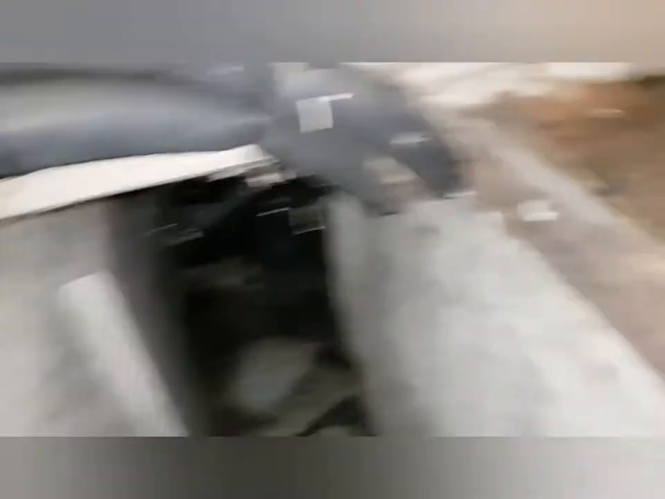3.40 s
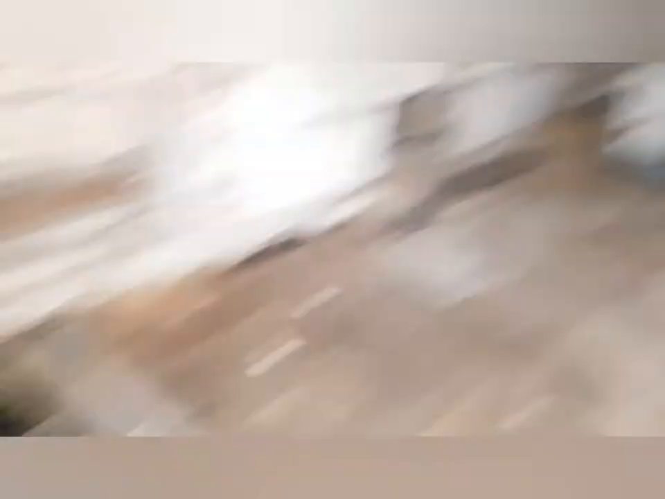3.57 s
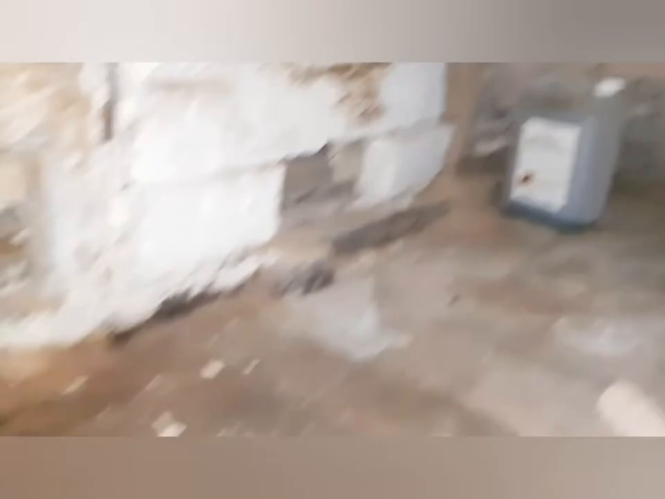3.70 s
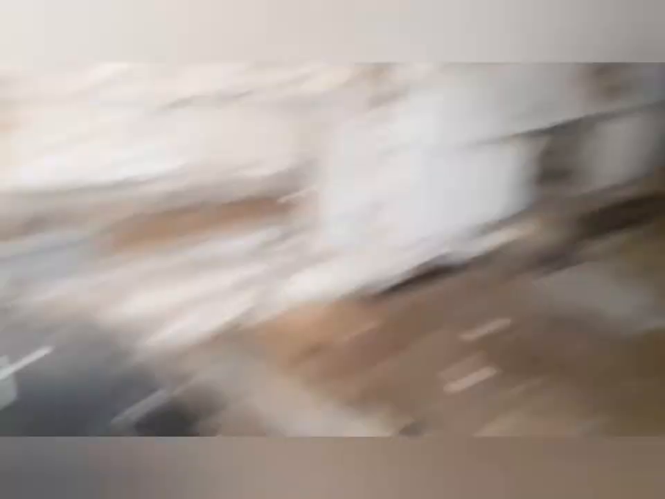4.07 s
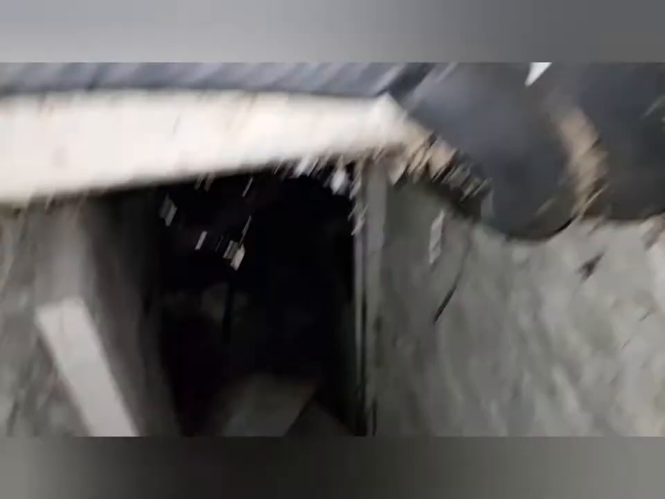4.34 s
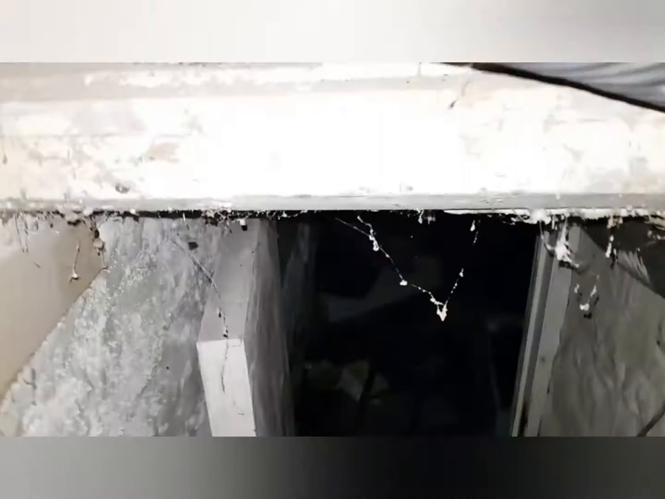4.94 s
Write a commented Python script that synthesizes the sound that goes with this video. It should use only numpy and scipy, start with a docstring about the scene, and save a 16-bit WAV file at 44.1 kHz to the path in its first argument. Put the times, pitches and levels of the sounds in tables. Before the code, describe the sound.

Someone walks carefully indoors: two heavy floor thumps early on, then lighter steps, fabric rustles and gritty scuffs over a faint low rumble.

```python
"""Footsteps on a littered board floor

Someone walks through an empty building, carrying a small two-port microphone.
Blows of feet, and a few cracks of litter, sum a one-swing push with decaying rings; sparse echoes follow.
Clothing swishes and soles scrape grit as shaped noise under one uneven grip.
Behind lie low swells of noise, a wavering sine hum in the first second or so, and faint steady air noise."""
import sys
import numpy as np
from scipy import signal
from scipy.io import wavfile
from scipy.ndimage import uniform_filter1d

SR = 44100
rng = np.random.default_rng(int(sys.argv[2]) if len(sys.argv) > 2 else 0)


def ratio_of_db(decibels):
    """Turn decibels (scalar or array-like) into linear amplitude factors; 0 dB maps to 1."""
    return 10 ** (np.asarray(decibels, float) / 20)


def persist_wave(psi):
    """Save psi, clipped to +-1, as 16-bit WAV."""
    counts = np.round(np.clip(psi, -1, 1) * 32767).astype(np.int16)
    wavfile.write(sys.argv[1], SR, np.atleast_2d(counts).T)


N = 270333  # samples


# modes of the boards, before a small random detuning: ring_hz, level_db, t60_s
BOARD_MODES = [(105, 1, 0.14), (151, 4.5, 0.25), (211, 2, 0.19), (275, 0, 0.13), (400, -6.5, 0.14),
               (660, -5, 0.18), (880, -5, 0.13)]


def floor_rings(t, ring_hz, hard_db):
    """Modal synthesis: a blow excites decaying sines, strongest near its own pitch."""
    boards, litter = len(BOARD_MODES), 110
    count = boards + litter
    board_hz, board_db, board_t60 = np.transpose(BOARD_MODES)[:, :, None]
    board_hz = board_hz * (1 + 0.024 * (rng.random((boards, 1)) - .5))
    # litter rings spread evenly over three octaves from 410 Hz
    litter_hz = 410 * 8 ** ((np.arange(litter)[:, None] + rng.random((litter, 1))) / litter)
    litter_db = np.full((litter, 1), -14.5)
    litter_t60 = 0.16 * (400 / litter_hz) ** 0.5  # higher rings die sooner
    hz = np.vstack([board_hz, litter_hz])
    t60 = np.vstack([board_t60, litter_t60])

    octaves = np.log2(hz / ring_hz)
    slope_db = np.where(octaves > 0, hard_db, 15.5)  # dB per octave, above and below the pitch
    share_db = np.vstack([board_db, litter_db]) + slope_db * octaves
    share_db -= 15 * np.clip(np.log2(hz / 1500), 0, None)  # rubber soles damp the top
    phase = rng.random((count, 1))
    phase[:boards] = .5  # in cycles: the boards all give way together
    rings = ratio_of_db(share_db - 60 * t / t60) * np.sin(2 * np.pi * (hz * t + phase))

    # the pieces lie left and right of the foot
    left_db = 9.0 * (rng.random((count, 1)) - .5) * np.clip(hz / 600, 0, 1)
    stereo = ratio_of_db(np.hstack([left_db, -left_db]).T) @ rings
    return stereo * (1 - np.exp(-t / 0.003))  # the sole lands over a few milliseconds


def sole_push(t, ring_hz, hard_db):
    """Impulsive loading: the foot's weight gives one Gaussian-windowed swing."""
    swing = 1.164 * ring_hz * t - 1
    push_db = -10.5 - 1.24 * hard_db  # a soft sole pushes more than it rings
    return ratio_of_db(push_db) * np.exp(-(swing / .5) ** 2) * np.cos(2 * np.pi * swing)


# blows of feet, with a few cracks and ticks of litter; peaks before the left-right balance,
# hardness as the slope above the loudest ring: start_s, peak_db, ring_hz, hardness_db_per_octave
FLOOR_BLOWS = [(.063, -38, 193, -11), (.115, -39, 200, -11), (.155, -42, 200, -11), (.514, -34, 880, -7),
               (.556, -14.5, 243, -13.5), (.588, -32, 900, 3), (.606, -38, 1800, -3), (.631, -39, 1700, -3),
               (.735, -38.5, 2600, -4), (.852, -33, 600, -4), (1.376, -28.5, 151, -5),
               (1.996, -37, 228, -11.5), (2.099, -13, 159, -2), (2.803, -36, 175, -7),
               (2.867, -25.5, 220, -5), (2.91, -37.5, 890, -0.5), (3.433, -32.5, 150, -4.5),
               (4.272, -33, 143, -4), (4.351, -31, 400, -3), (5.01, -23, 400, -9), (5.015, -30, 150, -9),
               (5.761, -32, 105, -5.5), (5.818, -33, 211, -9), (5.886, -32, 105, -5.5),
               (5.929, -35, 150, -2)]


def blows():
    """Superposition: each blow adds its push and rings to the floor's motion."""
    feet_left_db = 2.5  # left minus right
    t = np.arange(SR // 3) / SR
    out = np.zeros((2, N + SR))
    for start_s, peak_db, ring_hz, hard_db in FLOOR_BLOWS:
        rings = floor_rings(t, ring_hz, hard_db)
        blow = rings / abs(rings).max() + sole_push(t, ring_hz, hard_db)
        at = round(start_s * SR)
        out[:, at:at + len(t)] += ratio_of_db(peak_db) * blow / abs(blow).max()
    return out[:, :N] * ratio_of_db([[feet_left_db / 2], [-feet_left_db / 2]])


# reverberation time of the bare room: band_hz, t60_s
ROOM_DECAY = [(100, 0.96), (700, 0.094), (3000, 0.23)]


def room(x):
    """Reverberation: sparse echoes of random sign, each band with its own decay, bass alike on both sides."""
    length, gap = SR // 2, 20
    taps = np.zeros((2, length))
    at = np.arange(200, length - gap, gap) + rng.integers(0, gap, (2, (length - 201) // gap))
    np.put_along_axis(taps, at, rng.choice([-1., 1.], at.shape), 1)
    hz, t, z = signal.stft(taps, SR, nperseg=512)
    same = likeness(hz)
    z[1] = same * z[0] + np.sqrt(1 - same ** 2) * z[1]
    z *= ratio_of_db(-60 * t / read(ROOM_DECAY, hz)[:, None])
    z /= np.sqrt((abs(z) ** 2).mean((0, 2), keepdims=True))
    z *= (hz / (hz + 400))[:, None]  # the room gives back little bass
    tail = signal.istft(z, SR, nperseg=512)[1]
    return signal.fftconvolve(x, tail / np.linalg.norm(tail[0]), axes=1)[:, :N]


def rubbing():
    """Friction: fabric on fabric and crumbs under the sole share one uneven grip."""
    t = np.arange(N) / SR
    grip = stick_slip(per_s=330, spread_db=5.3, grain_s=0.003, share=0.22)
    return grip * (fabric(t) + crumbs(t))


# swishes of clothing, levels before the fabric gain; swell and fade are times per 10 dB:
# fastest_s, level_db, swell_s, fade_s, stop_after_s
CLOTH_STROKES = [(.03, -50.5, .06, .35, .27), (.49, -59, .9, .9, .03), (.6, -43, .04, .1, .2),
                 (.86, -49.5, .14, .14, .15), (1.2, -45, .14, .2, .08), (1.54, -54, .25, .07, .05),
                 (1.65, -59, .06, .2, .3), (1.95, -61, .15, .9, .14), (2.26, -53.5, .16, .17, .21),
                 (2.59, -54, .09, .9, .1), (2.765, -43, .11, .065, .1), (3.01, -42.5, .07, .08, .03),
                 (3.17, -53.5, .3, .5, .2), (3.44, -53.5, .15, .07, .1), (3.5, -58.5, .3, .33, .7),
                 (4.27, -50, .055, .9, .07), (4.345, -40.5, .035, 2.5, .105), (4.49, -52.5, .04, .17, .17),
                 (4.89, -53, .25, .6, .12), (5.11, -43, .12, .3, .17), (5.58, -50, .14, .14, .045),
                 (5.66, -64, .1, .9, .1), (5.77, -50.5, .015, 1.5, .2), (5.96, -44.5, .08, .25, .14)]
# quick flicks of cloth or litter, levels before the same gain; fade is the time per 10 dB,
# top_db is the gain of the top octave: peak_s, level_db, fade_s, top_db
CLOTH_FLICKS = [(.518, -42, .02, -14), (2.11, -48, .08, -13), (4.347, -44, .012, 4), (4.536, -41, .02, 5)]


def cloth_power(t):
    """Energy addition: powers of all swishes and a faint floor sum; each flick's power is kept apart."""
    flick_swell_s, still_db = .009, -79  # swell per 10 dB; floor level
    rows = [(s, db, flick_swell_s, fade_s) for s, db, fade_s, _ in CLOTH_FLICKS]
    return swells(CLOTH_STROKES, t).sum(0) + ratio_of_db(still_db) ** 2, swells(rows, t)


# tighter folds for a while: from_s, to_s, ring_hz, gain_db
TIGHT_FOLDS = [(2.69, 3.06, 3100, 9.5), (2.69, 3.06, 5800, 3), (4.2, 4.47, 5100, 5), (4.2, 4.47, 7600, 5)]


def fold_tilt(t, hz):
    """Resonance: folds boost bands of the fabric noise (dB); flicks make its top duller or brighter."""
    folds = [(0, N / SR, 2930, 2.5)] + TIGHT_FOLDS  # one fold rings throughout
    fold_db = 0
    for from_s, to_s, ring_hz, gain_db in folds:
        active = (t >= from_s) * (t < to_s)
        fold_db = fold_db + gain_db * active * np.exp(-((hz / ring_hz - 1) / .21) ** 2)
    strokes, flicks = cloth_power(t)
    flick_top_db = np.transpose(CLOTH_FLICKS)[3]
    # power-weighted between the swishes' -3 dB and the flicks' own top
    top_db = (-3 * strokes + flick_top_db @ flicks) / (strokes + flicks.sum(0))
    return fold_db + top_db * np.clip(np.log2((hz + 1) / 7000) / 0.4, 0, 1)


# relative spectral density of fabric noise: band_hz, level_db_per_hz
FABRIC_SPECTRUM = [(600, -19), (1500, 0), (3000, -5.5), (4300, -2.5), (5600, -2), (7500, -4), (9000, -7),
                   (12000, 0.4), (15500, -9.5)]


def fabric(t):
    """Friction noise: broadband hiss follows the power of the swishes and flicks."""
    fabric_db = 2.5  # gain of the fabric noise over the listed levels
    strokes, flicks = cloth_power(t)
    noise = hiss(FABRIC_SPECTRUM, size=256, patchy_db=1.8, wide_hz=350, long_s=0.14, tilt=fold_tilt)
    return np.sqrt(strokes + flicks.sum(0)) * ratio_of_db(fabric_db) * noise


# relative spectral density of crumb noise: band_hz, level_db_per_hz
GRIT_SPECTRUM = [(90, -12), (140, -2), (400, -4), (900, -3), (1500, -11), (3000, -23)]
# soles dragging over crumbs; swell and fade are times per 10 dB: hardest_s, level_db, swell_s, fade_s
SOLE_SCUFFS = [(.03, -54, .3, .35), (.6, -45.5, .03, .12), (.86, -49, .08, .09), (1.15, -54, .2, .2),
               (1.385, -52, .012, .09), (1.65, -56, .2, .15), (2.11, -49, .012, .22), (2.86, -49, .2, .12),
               (4.28, -49, .04, .2), (4.44, -46, .05, .04), (4.535, -47, .015, .07), (4.87, -52.5, .2, .3),
               (5.02, -41, .01, .08), (5.26, -48.5, .3, .06), (5.57, -49, .08, .04), (5.78, -52, .015, .07),
               (5.95, -48.5, .11, .16)]


def crumbs(t):
    """Granular friction: low-pitched noise broken into bursts follows the scuffs and the swishes."""
    shuffle_db, at_swish_db = -57, -50  # crumb level at this listed swish level
    strokes, flicks = cloth_power(t)
    cloth = strokes + flicks.sum(0)
    # crumbs moved by a swish grow less than it does
    shuffle = ratio_of_db(shuffle_db) ** 2 * (cloth / ratio_of_db(at_swish_db) ** 2) ** .78
    noise = hiss(GRIT_SPECTRUM, size=512, patchy_db=2.5, wide_hz=150, long_s=.04)
    noise = noise * stick_slip(per_s=90, spread_db=3.1, grain_s=0.0058, share=0.21)
    return np.sqrt(swells(SOLE_SCUFFS, t).sum(0) + shuffle) * noise


def stick_slip(per_s, spread_db, grain_s, share):
    """Stick-slip: a steady drag plus short decaying bursts, a few of them large."""
    sizes = ratio_of_db(spread_db * np.minimum(rng.exponential(1, N), 4))
    sizes = sizes * (rng.random(N) < per_s / SR)
    bursts = signal.oaconvolve(sizes, np.exp(-np.arange(2000) / (grain_s * SR)))[:N]
    return evened(1 - share + share * evened(bursts))


# low swells of air and floor; swell and fade are times per 10 dB: strongest_s, level_db, swell_s, fade_s
LOW_SWELLS = [(.1, -51, .9, 1.5), (2.2, -59, 2.5, .14), (2.9, -50, .17, .12), (3.4, -55.5, .25, .18),
              (3.925, -53, .06, .04), (4.5, -56, .15, .4), (5.06, -53, .2, .45), (5.85, -51, .07, 2.5)]
# relative spectral density of the low swells: band_hz, level_db_per_hz
LOW_SPECTRUM = [(20, -26), (40, -17), (62, 0), (85, -8), (130, -7.5), (300, -40.5)]


def rumble():
    """Band-limited noise: low hiss rises and falls with the swells."""
    t = np.arange(N) / SR
    noise = hiss(LOW_SPECTRUM, size=4096, patchy_db=2.0, wide_hz=20, long_s=.2)
    return np.sqrt(swells(LOW_SWELLS, t).sum(0)) * noise


def hum():
    """Frequency modulation: one slow random waver bends a sine's pitch and level together."""
    from_s, to_s = 0.064, 1.38
    t = np.arange(N) / SR
    waver = evened(uniform_filter1d(uniform_filter1d(rng.standard_normal(N), 4000), 4000))
    on = np.clip((t - from_s) / 0.044, 0, 1) * np.clip((to_s - t) / 0.33, 0, 1)
    tone = np.sin(2 * np.pi * np.cumsum(65.5 + .8 * waver) / SR)
    return np.sqrt(2) * ratio_of_db(-50 + 1.5 * waver) * on * tone  # about -50 dB rms


# relative spectral density of the background air: band_hz, level_db_per_hz
AIR_SPECTRUM = [(100, 0.5), (500, -13), (3000, -34), (5900, -13), (8700, -32), (13000, -15)]


def air():
    """Stationary noise: a faint coloured hiss at a fixed level."""
    return ratio_of_db(-66.5) * hiss(AIR_SPECTRUM, size=1024, patchy_db=-2.0, wide_hz=400, long_s=0.054)


# likeness of left and right: band_hz, correlation (no unit)
STEREO_LIKENESS = [(60, 0.9), (250, 0.81), (500, 0.41), (1000, 0.017)]


def likeness(hz):
    """Coherence: the two sides agree in the bass and differ in the treble."""
    return np.clip(read(STEREO_LIKENESS, hz), -1, 1)[:, None]


# balance of the noises: band_hz, left_minus_right_db
STEREO_LEAN = [(60, -0.5), (380, 3), (4000, -2.2), (13000, 0.8)]


def hiss(colour, size, patchy_db, wide_hz, long_s, tilt=None):
    """Spectral synthesis: random short-time spectra with drifting resonant patches, rms 1 before any tilt."""
    hop, hz = size // 4, np.fft.rfftfreq(size, 1 / SR)
    frames = N // hop + 5
    a, b, c, d, patches = rng.standard_normal((frames, len(hz), 5)).T
    patches = uniform_filter1d(patches, 1 + round(wide_hz * size / SR), 0)
    patches = evened(uniform_filter1d(patches, 1 + round(long_s * SR / hop), 1))
    same, left = likeness(hz), a + 1j * b
    right = same * left + np.sqrt(1 - same ** 2) * (c + 1j * d)
    lean = read(STEREO_LEAN, hz)[:, None] / 2
    z = np.array([left, right])
    z *= ratio_of_db(read(colour, hz)[:, None] + patchy_db * patches + np.array([lean, -lean]))
    scale = np.sqrt(np.mean(signal.istft(z, nperseg=size, noverlap=size - hop)[1] ** 2))
    if tilt is not None:
        z *= ratio_of_db(tilt(np.arange(frames) * hop / SR, hz[:, None]))
    return signal.istft(z, nperseg=size, noverlap=size - hop)[1][:, :N] / scale


def swells(rows, t):
    """Exponential growth and decay: power per row, straight in dB, with a quick stop where one is given."""
    out = []
    for s, db, swell_s, fade_s, *stop_s in rows:
        after = t - s
        level_db = db - 10 * np.where(after < 0, -after / swell_s, after / fade_s)
        if stop_s:
            level_db = level_db - 650 * np.clip(after - stop_s[0], 0, None)  # 650 dB per s
        out.append(ratio_of_db(level_db) ** 2)
    return np.array(out)


def evened(x):
    """Normalisation: scales a signal to rms 1."""
    return x / np.sqrt(np.mean(x ** 2) + 1e-20)


def read(points, hz):
    """Logarithmic frequency scale: interpolates a table evenly over octaves."""
    f, value = np.transpose(points)
    return np.interp(np.log(hz + 1), np.log(f + 1), value)


def scene():
    """Superposition: direct blows, their echoes at -5 dB, rubbing and background add."""
    feet = blows()
    return feet + ratio_of_db(-5) * room(feet) + rubbing() + rumble() + hum() + air()


def band_limit(x):
    """A steep low-pass at the top of the band."""
    return signal.sosfilt(signal.butter(12, 16250, fs=SR, output="sos"), x)


def record(dry):
    """Signal chain: the finished mix passes to the last stage at its own level."""
    return band_limit(dry)


dry = scene()
out = record(dry)
persist_wave(out)
```